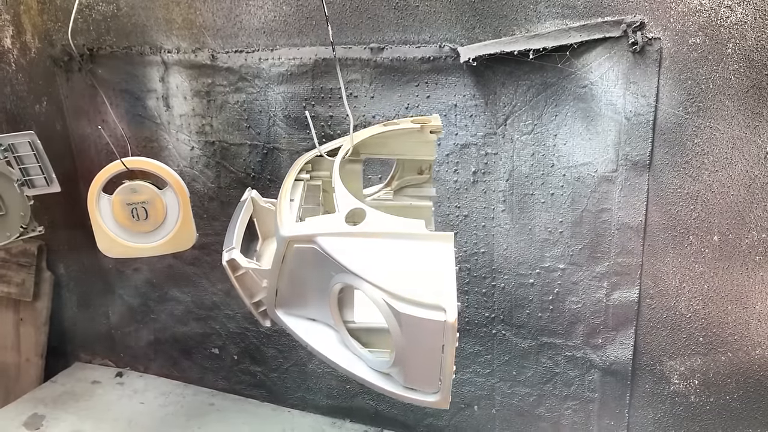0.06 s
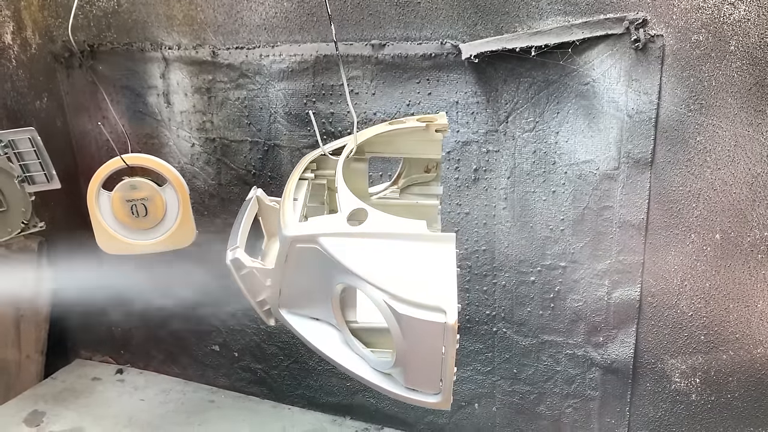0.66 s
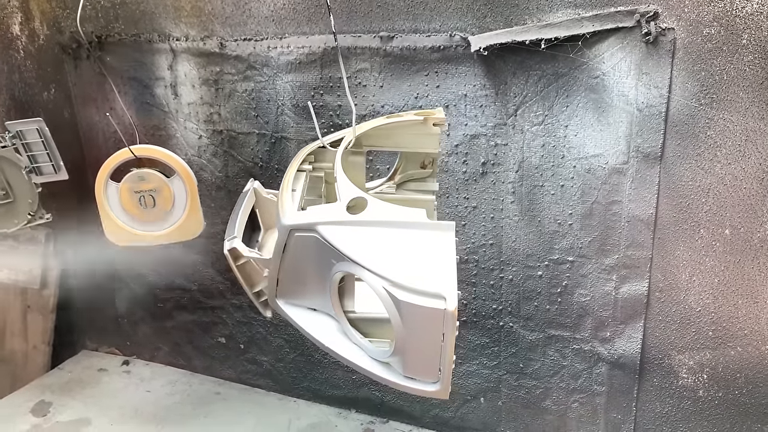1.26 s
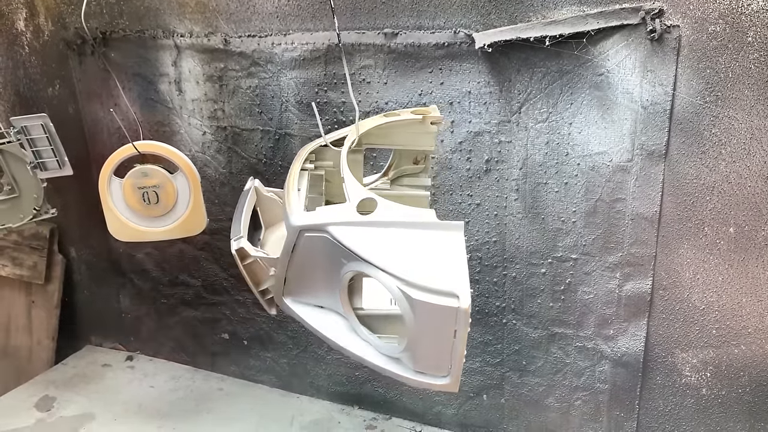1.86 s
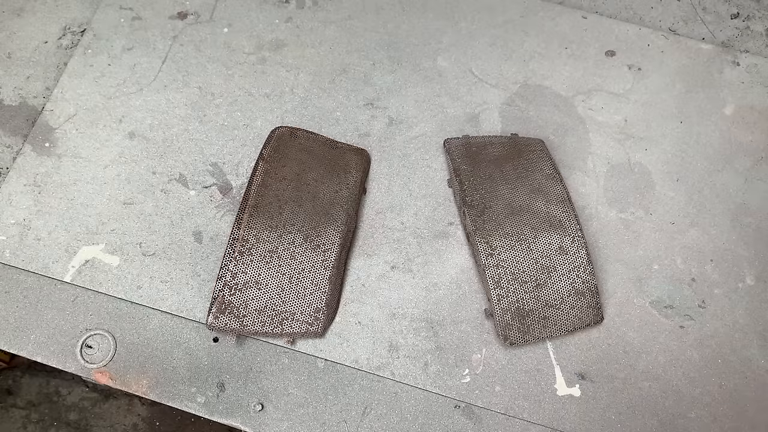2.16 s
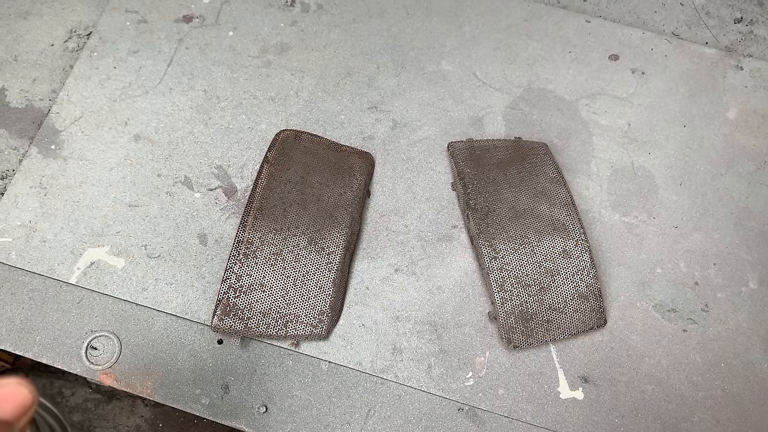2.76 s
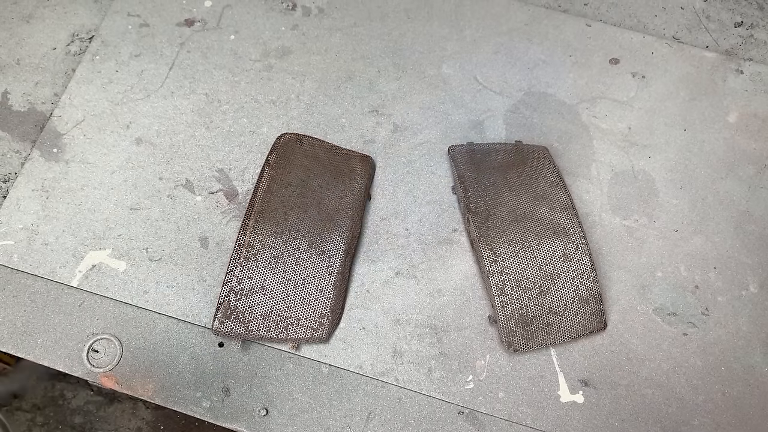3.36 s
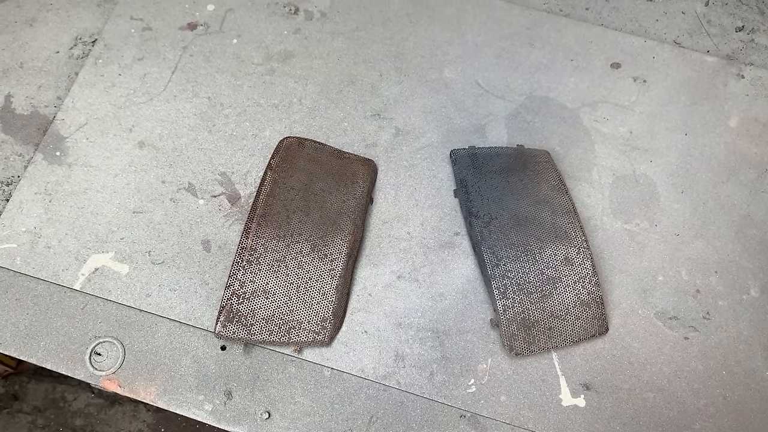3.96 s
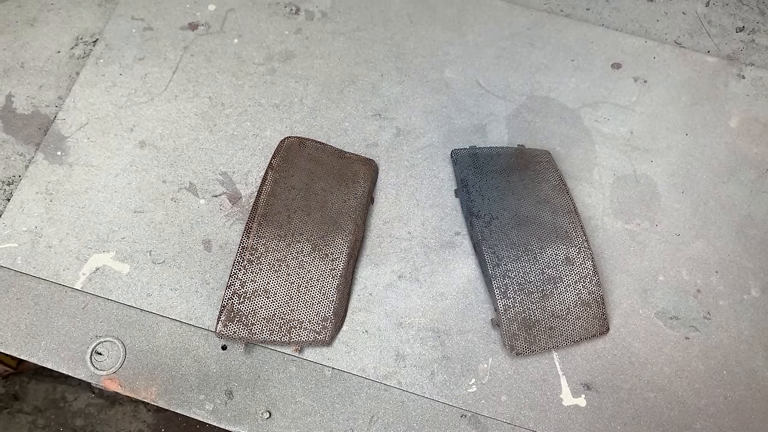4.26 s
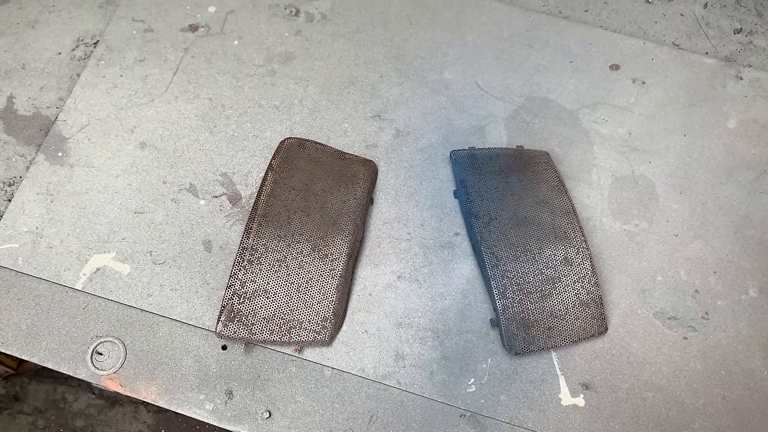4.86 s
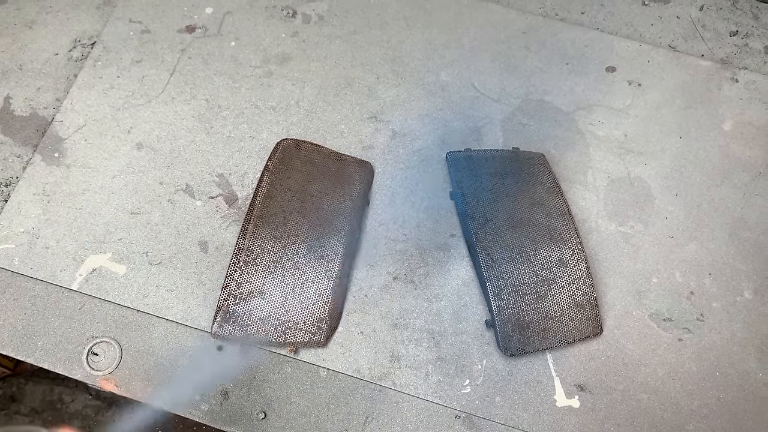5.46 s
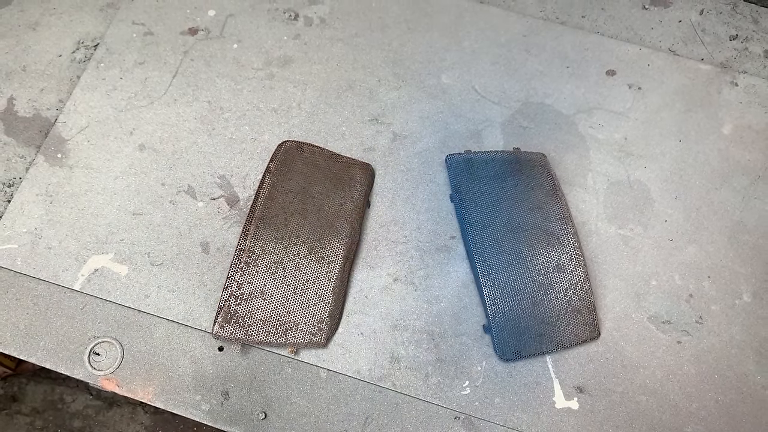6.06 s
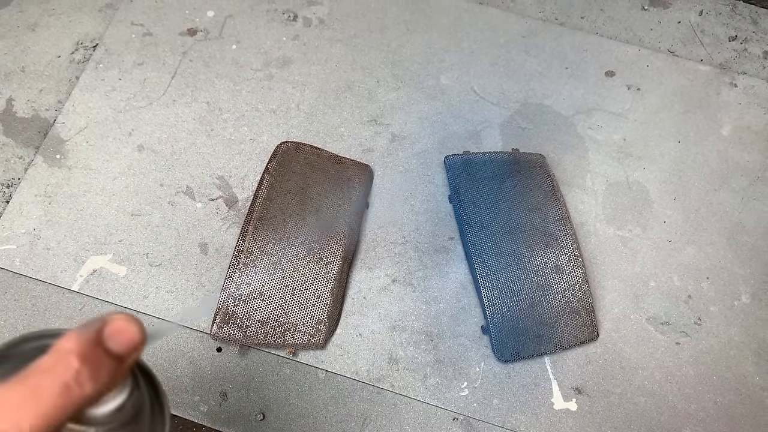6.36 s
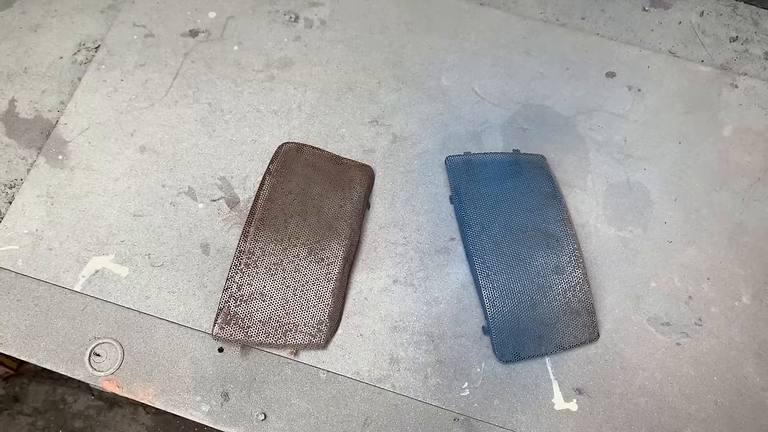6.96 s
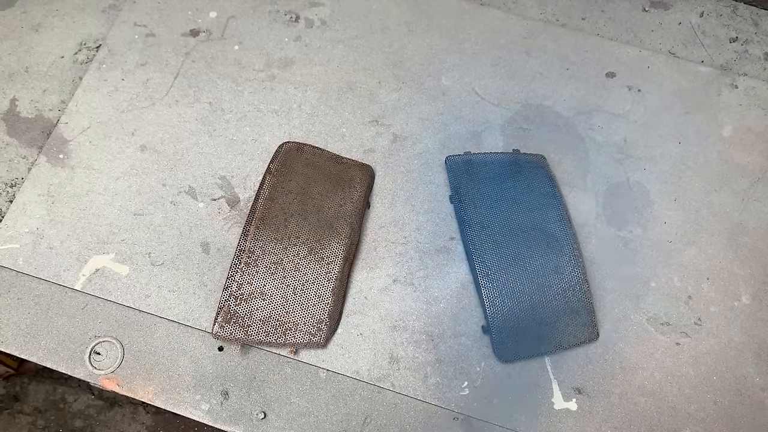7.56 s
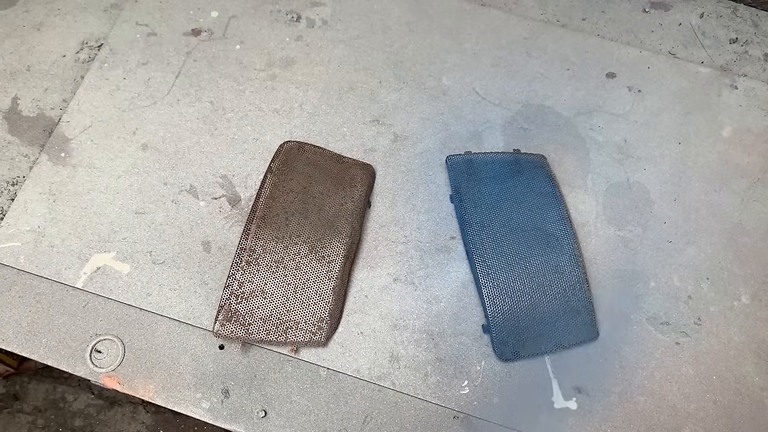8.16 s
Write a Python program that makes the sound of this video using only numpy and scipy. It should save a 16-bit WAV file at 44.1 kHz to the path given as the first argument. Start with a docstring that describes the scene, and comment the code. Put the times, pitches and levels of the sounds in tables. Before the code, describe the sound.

Close to the microphone, aerosol paint sprays in about ten short, bright hisses, roughly one a second. The first few hit a hanging panel, with faint ticks from the mixing ball between them; the rest, slightly louder, come from a second can aimed at trim on a bench. In the second half a distant bird gives faint rising chirps and something knocks softly once. Low machine rumble sits far back in the workshop.

```python
"""A workshop, the microphone close to the work: two aerosol cans spray in ten short bursts, first a hanging
panel, then trim on a bench. Each press opens, holds and shuts; the jet hisses in two broad humps, the cap
rings near 2.6 kHz and the mist rushes onto the part a moment later. Nearby, the mixing ball ticks in the
can, with faint rustles and a soft knock. Further off are low machine rumble, a din, an airy hiss and a
bird chirping under the roof. Mono, the same on both channels."""
import sys
import numpy as np
from scipy import signal
from scipy.fft import rfft, irfft, next_fast_len
from scipy.io import wavfile
from scipy.ndimage import map_coordinates

SR = 44100
rng = np.random.default_rng(int(sys.argv[2]) if len(sys.argv) > 2 else 0)


def generate_wav(signal):
    """Clip the signal to [-1, 1] and save it as 16-bit WAV at the path in sys.argv[1]."""
    frames = np.transpose(np.atleast_2d(signal))
    scaled = np.clip(frames, -1, 1) * 32767
    pcm = np.round(scaled).astype(np.int16)
    wavfile.write(sys.argv[1], SR, pcm)


N = 361614
TIME = np.arange(N) / SR
CAN_CHANGE_S = 1.94   # the panel is sprayed before this, the trim after
CUTOFF_HZ = 15880
NOZZLE_REST_HZ = 13200   # at this nozzle pitch the humps of the hiss are unshifted

# Presses of the valve. Each row: start, stop, opening time and closing time in seconds, top hiss in dB,
# swell in dB per second, lower hiss and cap noise in dB against the top hiss, nozzle resonance at
# mid-press in Hz, wait in seconds until the plume meets the part.
PRESSES = [ (-.05, .054, .03, 0.035, -41, 0, -6.5, -15.5, 11570, 0.023),
           (0.494, 0.91, 0.047, .04, -38.5, -8, -8.4, -16.5, 11810, 0.1),
           (1.225, 1.694, 0.11, .045, -38.5, 8.5, -7.5, -15.8, 11810, 0.13),
           (2.781, 2.949, 0.079, 0.049, -42.5, 42, -6, -17, 12150, 0.11),
           (3.38, 3.882, 0.13, 0.048, -34, -5.4, -6.5, -17.5, 12320, 0.09),
           (4.327, 4.862, 0.1, 0.033, -35, -7.4, -6, -18.5, 12470, 0.052),
           (5.329, 5.834, 0.092, 0.043, -36, -4.5, -4.5, -18, 13080, 0.054),
           (6.342, 6.857, 0.1, 0.06, -37.5, -3.5, -3, -15.5, 14020, 0.055),
           (7.281, 7.634, 0.043, 0.047, -36.5, -13.5, -4.2, -18, 14370, .02),
           (8.046, 8.26, 0.068, .04, -35.5, 19, -7, -15.5, 11900, 0.041), ]


def from_db(db):
    """Decibels to gain."""
    return 10 ** (np.asarray(db) / 20)


def rms_one(x):
    """Scale to unit power."""
    return x / np.sqrt(np.mean(x ** 2) + 1e-20)


def ease(share):
    """A quarter sine from 0 to 1."""
    return np.sin(np.pi / 2 * np.clip(share, 0, 1))


def at_hz(spectrum, hz):
    """Gain of a spectrum at these frequencies, nearly nothing beyond its ends."""
    f, db = np.transpose(spectrum)
    return from_db(np.interp(np.log(hz + 1), np.log(f), db, left=-90, right=-90))


def noise(spectrum):
    """Steady noise of a given colour, rms 1."""
    size = next_fast_len(N)
    colour = at_hz(spectrum, np.fft.rfftfreq(size, 1 / SR))
    return rms_one(irfft(rfft(rng.standard_normal(size)) * colour, size)[:N])


def lag(x, seconds):
    """One-pole smoothing."""
    r = np.exp(-1 / (seconds * SR))
    return signal.lfilter([1 - r], [1, -r], x)


def drift(rate_hz):
    """A smooth random wander, rms 1."""
    seconds = 1 / (2 * np.pi * rate_hz)
    return rms_one(lag(lag(rng.standard_normal(N + SR), seconds), seconds)[SR:])


def swells(rows):
    """Short rushes of noise, each around its own pitch."""
    out = np.zeros(N)
    for middle, length, hz, octaves, db in rows:
        band = signal.butter(2, hz * 2 ** (octaves * np.array([-.5, .5])), "band", fs=SR, output="sos")
        inside = np.abs(TIME - middle) < length / 2
        rush = rms_one(signal.sosfilt(band, rng.standard_normal(SR))[-inside.sum():])
        out[inside] += from_db(db) * rush * np.cos(np.pi * (TIME[inside] - middle) / length)
    return out


def strike(hits, modes):
    """Every hit rings all the modes, each with a strength of its own."""
    out = np.zeros(N)
    starts, hit_db = np.transpose(hits)
    for hz, db, t60 in modes:
        clicks = np.full(N, 1e-18)
        clicks[(starts * SR).astype(int)] = from_db(hit_db + db + rng.normal(0, 2.5, len(starts)))
        r, w = from_db(-60 / (t60 * SR)), 2 * np.pi * hz / SR
        out += signal.lfilter([0, np.sin(w)], [1, -2 * r * np.cos(w), r * r], clicks)
    return out


def reverb(x, t60, steepen=1):
    """Dense reflections that die away, at unit power gain; steepen > 1 makes the end fall faster."""
    tail = rng.standard_normal(SR) * np.exp(-np.log(1000) * (TIME[:SR] / t60) ** steepen)
    return signal.fftconvolve(x, tail / np.linalg.norm(tail))[:N]


def finger_pressure(edge_s=.0036):
    """Gain of the flow, stepping as the finger presses lighter or harder for a moment."""
    # Each row: start and stop in seconds, step in dB.
    surges = [(0.486, 0.535, -7.5), (1.23, 1.287, -5.5), (2.888, 2.96, 8), (5.425, 5.62, 2),
              (6.405, 6.677, 1), (7.308, 7.378, 2)]
    steps_db = sum(db * ((TIME >= start) & (TIME < stop)) for start, stop, db in surges)
    return from_db(lag(steps_db, edge_s))


def valve(cap_sag_db_per_s=3.5, nozzle_rise_hz_per_s=3200, plume_rise_s=.065, early_mist=.17):
    """Each press opens, holds and shuts: gains of top hiss, lower hiss, cap and mist, and nozzle pitch."""
    top, lower, cap, plume = np.zeros((4, N))
    pitch = np.full(N, float(NOZZLE_REST_HZ))
    pressure = finger_pressure()
    for start, stop, opening, closing, db, swell, lower_db, cap_db, nozzle_hz, wait in PRESSES:
        held = (TIME > start) & (TIME < stop)
        t = TIME[held]
        from_middle = t - (start + stop) / 2
        flow = ease((t - start) / opening) ** 1.4 * ease((stop - t) / closing)   # cracks open gently
        level = from_db(db + swell * from_middle) * pressure[held]
        top[held] = level * flow
        lower[held] = level * flow * from_db(lower_db)
        # the cap noise swings less than the jet and sinks against it during a press
        cap[held] = level * flow ** .77 * from_db(cap_db - cap_sag_db_per_s * from_middle)
        # only a share of the mist lands until the plume swings onto the part
        on_part = ease((t - start - wait) / plume_rise_s)
        plume[held] = cap[held] * (early_mist + (1 - early_mist) * on_part)
        pitch[held] = nozzle_hz + nozzle_rise_hz_per_s * from_middle
    return top, lower, cap, plume, pitch


def jet(spectrum, pitch, upper_db, lower_db, split_hz=10000, lower_ratio=.59, width_hz=720):
    """Turbulence at the nozzle, two resonances sliding with its pitch: top and lower parts, rms 1 each."""
    hz, seconds, white = signal.stft(rng.standard_normal(N), SR, nperseg=512)
    hz, centre = hz[:, None], np.interp(seconds, TIME, pitch)
    slide = (centre / NOZZLE_REST_HZ) ** .15   # the broad humps follow the pitch a little
    humps = at_hz(spectrum, np.minimum(hz / slide, 15400))
    upper_lift = upper_db / (1 + ((hz - centre) / width_hz) ** 2)
    lower_lift = lower_db / (1 + ((hz / lower_ratio - centre) / width_hz) ** 2)
    hiss = white * humps * from_db(upper_lift + lower_lift) * (hz < CUTOFF_HZ)
    parts = (hz >= split_hz, hz < split_hz)
    return np.array([rms_one(signal.istft(hiss * part)[1][:N]) for part in parts])


def cap_noise(ring_db=-7.5, flutter_db=1.0):
    """The cap rings in the flow: a fluttering band of noise with a narrow core."""
    # Spectra of the band and its core. Each row: frequency in Hz, relative level in dB.
    band = [(900, -11), (1450, -11.5), (1750, -4), (2000, -9), (2280, 0.5), (2550, -2), (2740, -16),
            (2880, -9.5), (3200, -9.5), (3650, -4.5), (4300, -9.5), (6000, -7.5), (7000, -27)]
    core = [(2380, -21.5), (2560, 0), (2640, -4), (2710, -1), (2830, -19)]
    return rms_one(noise(band) + from_db(ring_db) * noise(core)) * from_db(flutter_db * drift(25))


def mist(at_panel, panel_db=-5.5, bench_db=-7.5, flutter_db=1.04):
    """The mist lands on the part with a low, fluttering rush."""
    # Spectra of the landing. Each row: frequency in Hz, relative level in dB.
    panel_rush = [(76, -54), (130, -11), (194, -7.5), (345, -2), (379, -1), (520, -9), (572, -2),
                  (792, 0.5), (1260, -12), (1600, -16), (2080, -41.5), (3520, -120)]
    bench_rush = [(70, -27), (130, -18.5), (250, -1.5), (400, -2), (530, 0), (680, -3.5), (900, -0.5),
                  (1230, -3.5), (1450, -14), (1700, -16.5), (2100, -32.5)]
    on_panel = from_db(panel_db) * noise(panel_rush)
    on_bench = from_db(bench_db) * noise(bench_rush)
    return np.where(at_panel, on_panel, on_bench) * from_db(flutter_db * drift(26))


def hand_stroke():
    """Seconds from the middle of the latest press, held once it stops."""
    out = np.zeros(N)
    for start, stop, *_ in PRESSES:
        out = np.where(TIME > start, np.minimum(TIME, stop) - (start + stop) / 2, out)
    return out


def near_echo(x, delay_s, sway, share):
    """A close surface throws the hiss back; the delay wanders with the hand."""
    delay = delay_s * SR * (1 + sway * drift(.4))
    echo = map_coordinates(x, [np.arange(N) - delay], order=3)
    return (x + share * echo) / np.sqrt(1 + share ** 2)


def spray(sputter_db=.52, flutter_db=.5, approach_s_per_s=.00036):
    """Jet, cap and landing mist, close up; uneven flow makes them all sputter together."""
    # Spectra of the two cans' jets. Each row: frequency in Hz, relative level in dB.
    panel_hiss = [(3290, -21), (5600, -18.5), (6550, -11.5), (7570, -5), (9130, -7.5), (10700, -2.5),
                  (12300, 0), (13400, -3), (14700, -0.5), (15900, -7.5)]
    bench_hiss = [(3290, -55.5), (5600, -29), (6080, -17), (7000, -7), (7500, -4), (8480, -2), (10200, -7),
                  (11900, 0), (12600, 0.5), (15200, 0.5), (15900, -18)]
    top, lower, cap, plume, pitch = valve()
    at_panel = TIME < CAN_CHANGE_S
    panel_jet = jet(panel_hiss, pitch, upper_db=.5, lower_db=-1.6)
    bench_jet = jet(bench_hiss, pitch, upper_db=5.0, lower_db=3.5)
    top_hiss, lower_hiss = np.where(at_panel, panel_jet, bench_jet)
    direct = top * top_hiss + lower * lower_hiss + cap * cap_noise() + plume * mist(at_panel)
    direct *= from_db(sputter_db * drift(16) + flutter_db * drift(190))
    # the surface being painted and a wall beside it each comb the hiss
    off_panel = near_echo(direct, delay_s=.0044, sway=.04, share=.16)
    off_panel = near_echo(off_panel, delay_s=.0061, sway=.04, share=.1)
    nearest_s = .00155 - approach_s_per_s * hand_stroke()   # the hand pushes in during a press
    off_bench = near_echo(direct, delay_s=nearest_s, sway=.02, share=.2)
    off_bench = near_echo(off_bench, delay_s=.0031, sway=.03, share=-.2)
    return np.where(at_panel, off_panel, off_bench)


def edge_puffs():
    """The plume catches an edge and puffs."""
    # Each row: middle and length in seconds, pitch in Hz, width in octaves, level in dB.
    puffs = [(.025, 0.062, 759, 1.1, -69.5), (1.54, 0.15, 727, .6, -66.5), (2.915, 0.068, 475, 1.6, -57.5),
             (3.52, 0.1, 298, 1.2, -62.5), (6.63, .11, 364, 0.83, -57), (7.345, .072, 1290, 1.3, -57.5)]
    return swells(puffs)


def workshop(rumble_db=-70, din_flutter_db=2.54):
    """Room tone: machine rumble under a changing far din and a faint airy hiss."""
    # Spectra. Each row: frequency in Hz, relative level in dB.
    rumble_colour = [(20, -32), (35, -10), (49, 1.5), (64, -2.5), (77, 2.5), (88, -6.5), (130, -13.5),
                     (200, -21.5), (400, -32.5)]
    din_colour = [(120, -10.5), (250, 3.5), (400, 4.5), (600, 1), (950, -3.5), (1250, -2.5), (1700, -13.5),
                  (2600, -24), (5000, -30.5)]
    air_colour = [(1200, -13.5), (2400, 2.5), (3500, -1), (4300, -3), (5300, -9.5), (7000, -15),
                  (11000, -16), (15000, -27)]
    # Rise and fall of the din and the hiss. Each row: time in seconds, level in dB.
    din_levels = [(.1, -77.5), (.42, -90), (1.15, -90), (1.7, -82.5), (1.92, -78.5), (2.35, -76),
                  (4.3, -77), (6.25, -80), (8.1, -78.5)]
    air_levels = [(.42, -92), (1.15, -89.5), (1.8, -85), (2.4, -91.5), (3.2, -79.5), (4.1, -85), (8.1, -85)]
    din_db = np.interp(TIME, *np.transpose(din_levels))
    air_db = np.interp(TIME, *np.transpose(air_levels))
    din = noise(din_colour) * from_db(din_db + din_flutter_db * drift(6.0))
    return from_db(rumble_db) * noise(rumble_colour) + din + from_db(air_db) * noise(air_colour)


def mixing_ball(room_db=-6.0):
    """The ball ticks against the can, which rings briefly into the room."""
    # Each row: start in seconds, level in dB.
    hits = [(.932, -52), (.953, -55), (.964, -55), (1.003, -65), (1.016, -65), (1.037, -65), (1.093, -65.5),
            (1.212, -65), (1.73, -59)]
    # Each row: frequency in Hz, relative level in dB, seconds to fall 60 dB.
    can_modes = [(3230, -9, .03), (3520, -9, .018), (4550, -17, .012), (7550, -21, .012)]
    ticks = strike(hits, can_modes)
    return ticks + from_db(room_db) * reverb(ticks, t60=.13)


def bench_rustles():
    """Faint rustles and far tones around the bench."""
    # Each row: middle and length in seconds, pitch in Hz, width in octaves, level in dB.
    rustles = [(2.2, .13, 3760, .36, -86), (2.37, 0.38, 1370, .24, -80), (2.33, 0.14, 3180, .3, -86.5),
               (2.56, 0.11, 3670, .24, -90), (2.76, .18, 2980, .4, -75), (2.77, 0.32, 690, .16, -73),
               (3.0, 0.73, 1260, .089, -78.5), (3.05, 0.19, 2480, .055, -81.5),
               (3.24, 0.46, 4600, .8, -83.5), (5.2, 0.4, 2024, .56, -77.5)]
    return swells(rustles)


def bird(note_hz=2050, note_s=.047, start_hz=2450, sweep_s=.051, bend=.78, fade_s=.003, waver=.014):
    """A short wavering whistle, then a fast upsweep that is loudest near its middle."""
    # Each row: start of the upsweep in seconds, top pitch in Hz, levels of sweep and opening note in dB.
    chirps = [(4.853, 5050, -61, -83), (5.156, 5320, -57.5, -77), (5.817, 5060, -57, -78),
              (6.143, 5260, -57.5, -74), (6.81, 5210, -58.5, -80), (7.121, 5400, -55.5, -75),
              (7.782, 5070, -58, -78.5)]
    out = np.zeros(N)
    wobble = 1 + waver * drift(90)
    t = np.arange(-note_s, sweep_s, 1 / SR)
    rise = np.clip(t / sweep_s, 0, 1) ** bend
    edges = ease(np.minimum(t + note_s, sweep_s - t) / fade_s) ** 2
    for start, top_hz, sweep_db, note_db in chirps:
        span = int((start - note_s) * SR) + np.arange(len(t))
        hz = wobble[span] * np.where(t < 0, note_hz, start_hz + (top_hz - start_hz) * rise)
        swell = from_db(sweep_db) * np.abs(np.sin(np.pi * rise)) ** .95 + from_db(note_db) * (t < 0)
        out[span] += edges * swell * np.sin(2 * np.pi * np.cumsum(hz) / SR)
    return out


def soft_knock():
    """Something nearby is knocked and bounces once, ringing low and short."""
    # Each row: start in seconds, level in dB.
    hits = [(5.96, -57.5), (5.976, -55)]
    # Each row: frequency in Hz, relative level in dB, seconds to fall 60 dB.
    modes = [(131, -6.5, .1), (215, -3.5, 0.056), (428, -7, .05), (900, -14, 0.055), (1656, -11, 0.088)]
    return strike(hits, modes)


def scene(booth_db=-25.5, hall_db=-13.5, hall_top_hz=6500, bird_direct_db=-11.5, bird_hall_db=4.5):
    """The can is close to the microphone and nearly dry; the bird is heard mostly through the hall."""
    handling = mixing_ball() + bench_rustles() + soft_knock()
    near = spray() + edge_puffs() + handling
    booth = from_db(booth_db) * reverb(near, t60=.22, steepen=2.2)
    # the treble of the hiss beams forward, so only the rest of it rings on in the hall
    lows = signal.sosfilt(signal.butter(6, hall_top_hz, fs=SR, output="sos"), near)
    hall = from_db(hall_db) * reverb(lows, t60=.24)
    calls = bird()
    far = from_db(bird_direct_db) * calls + from_db(bird_hall_db) * reverb(calls, t60=.62)
    mono = near + booth + hall + far + workshop()
    return np.array([mono, mono])


def record(dry):
    """The highest treble is cut steeply."""
    return signal.sosfilt(signal.ellip(12, .1, 80, CUTOFF_HZ, fs=SR, output="sos"), dry)


dry = scene()
out = record(dry)
generate_wav(out)
```